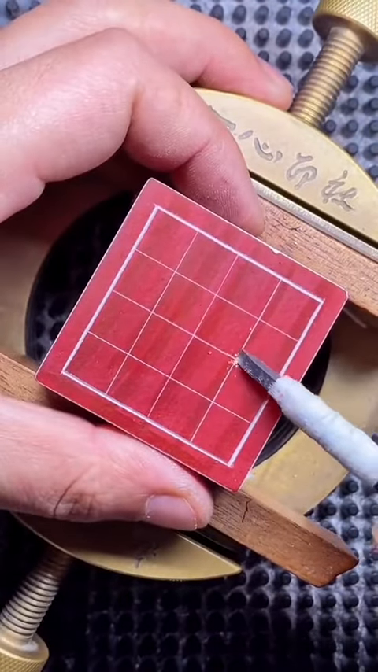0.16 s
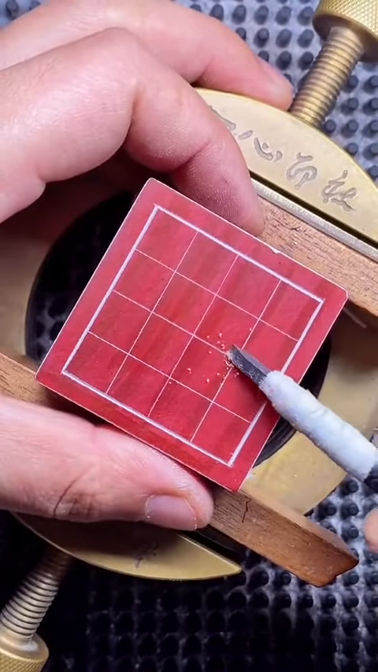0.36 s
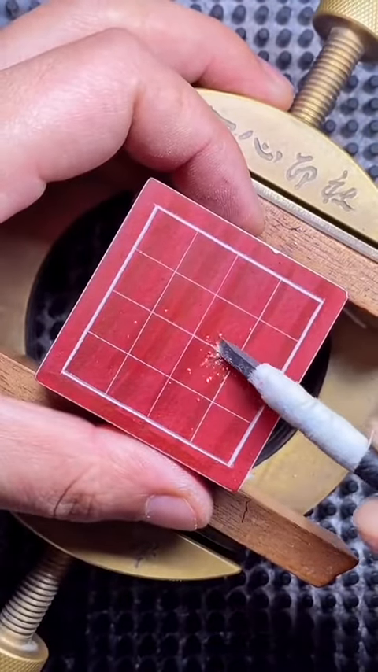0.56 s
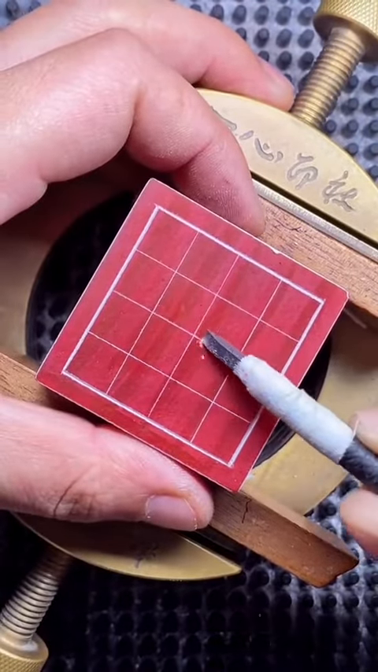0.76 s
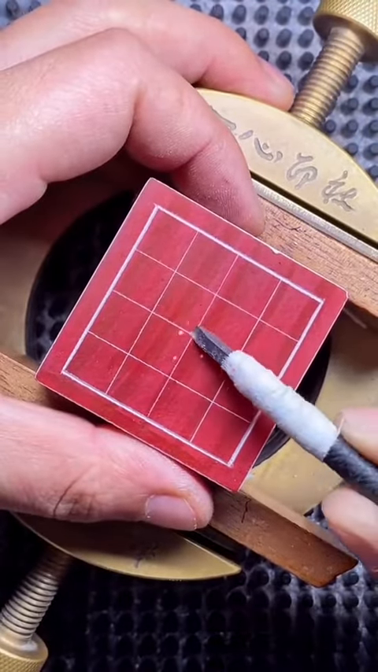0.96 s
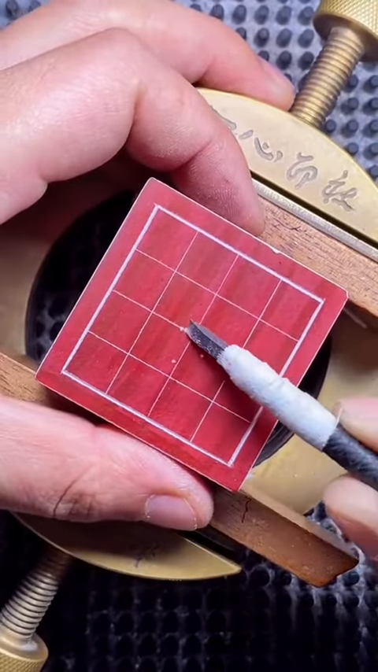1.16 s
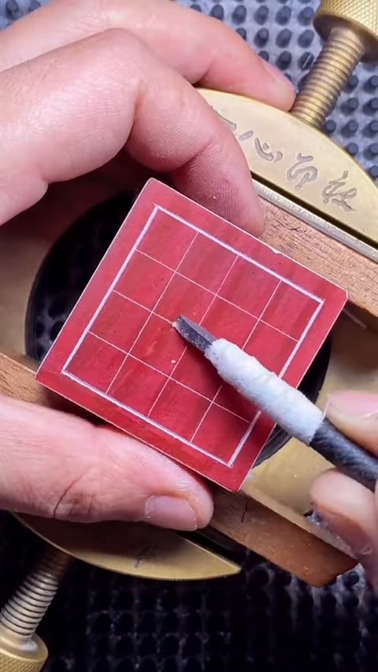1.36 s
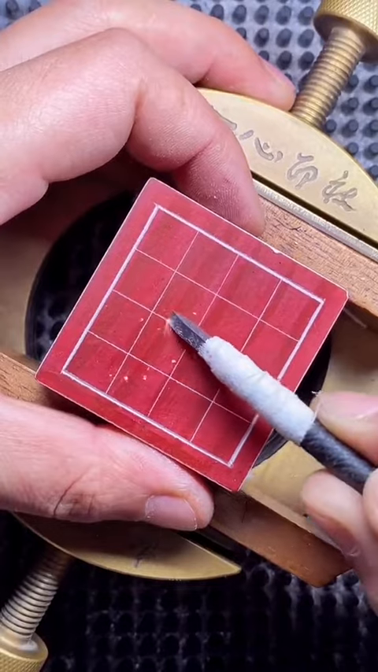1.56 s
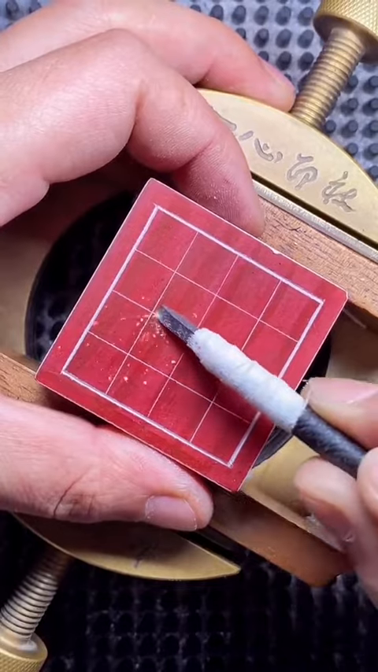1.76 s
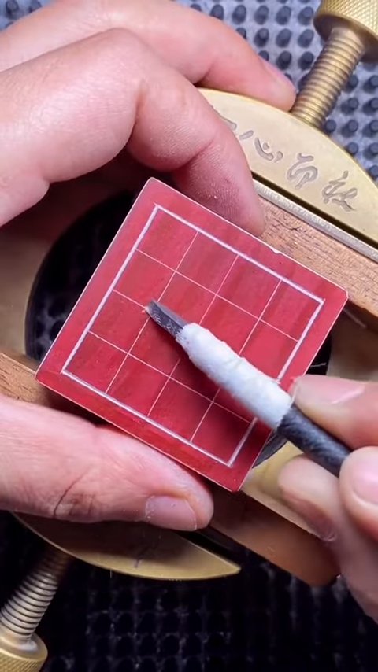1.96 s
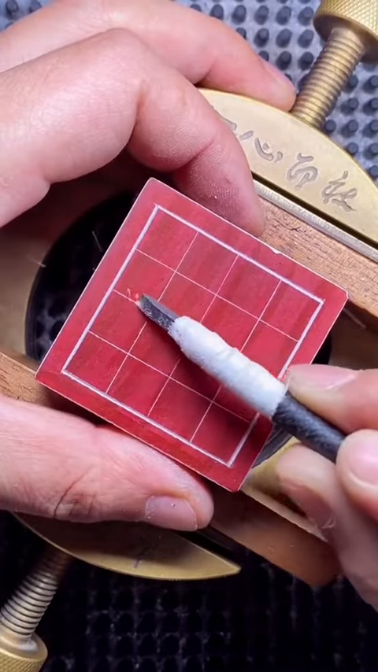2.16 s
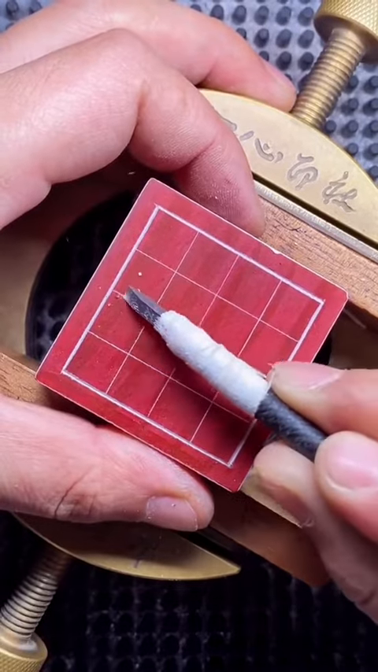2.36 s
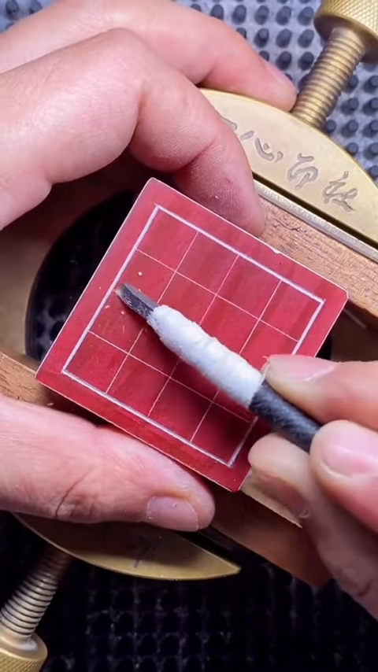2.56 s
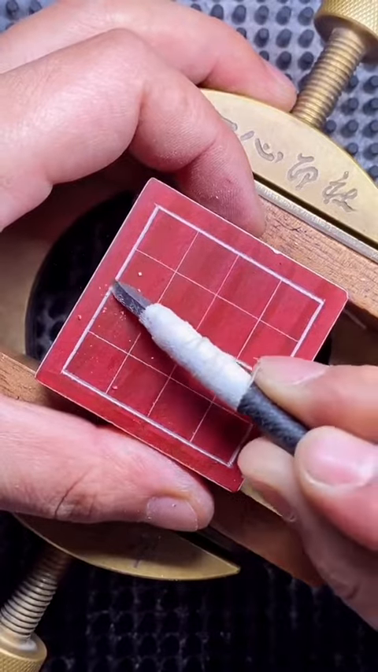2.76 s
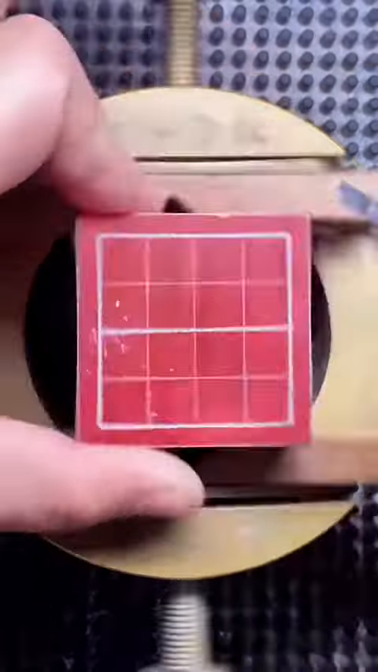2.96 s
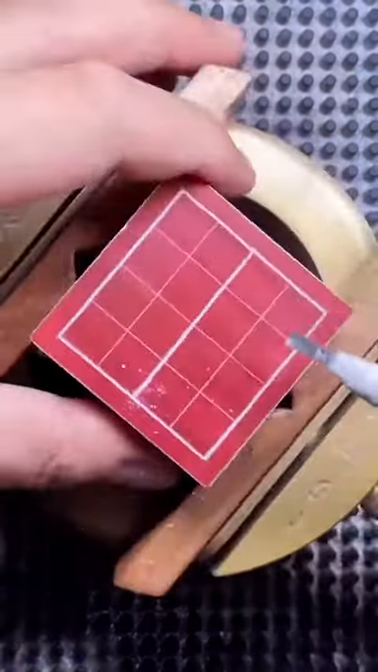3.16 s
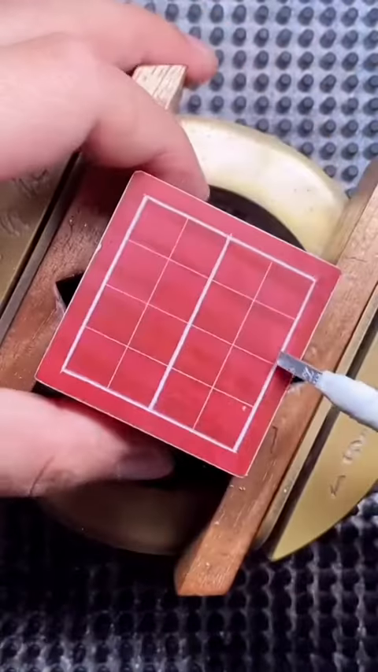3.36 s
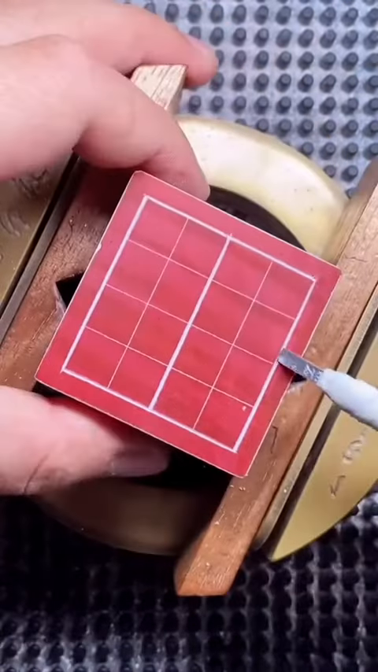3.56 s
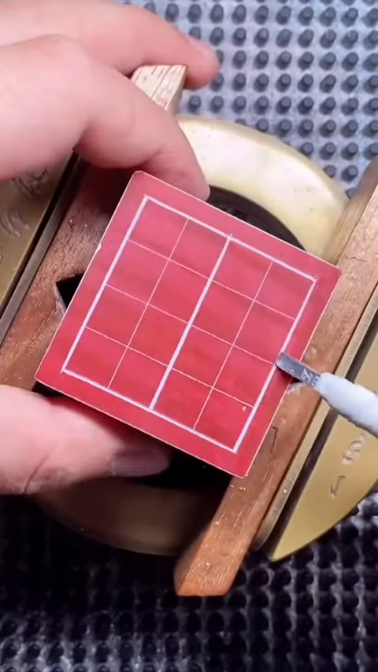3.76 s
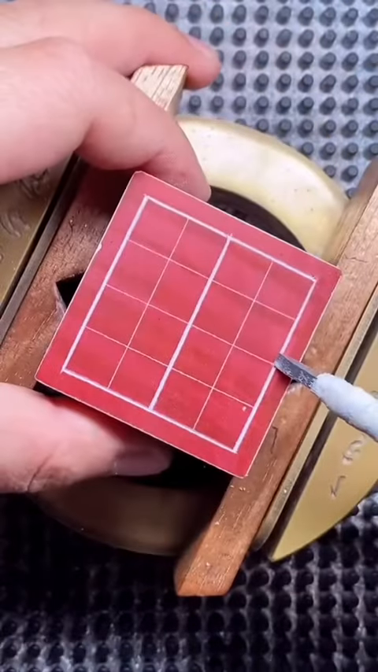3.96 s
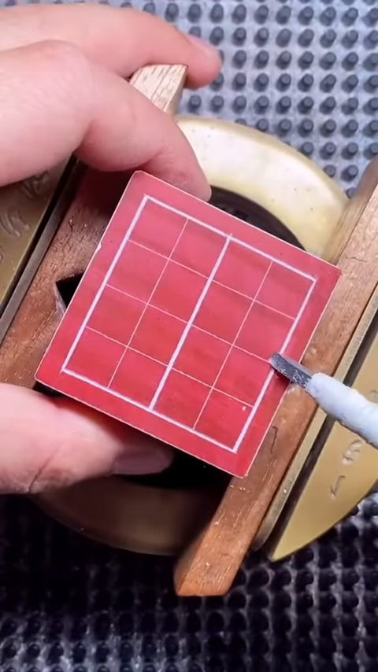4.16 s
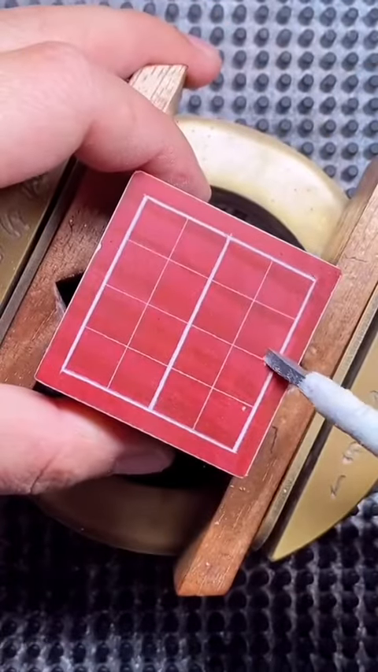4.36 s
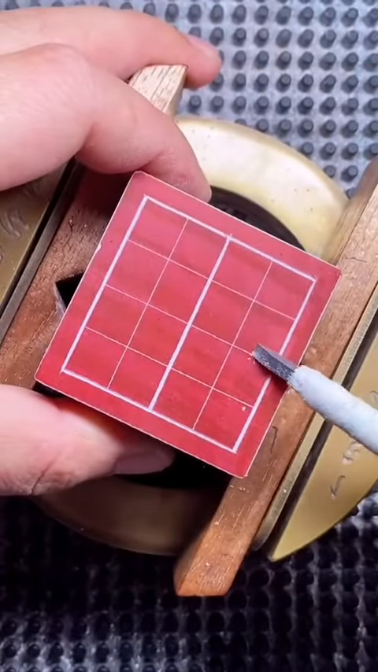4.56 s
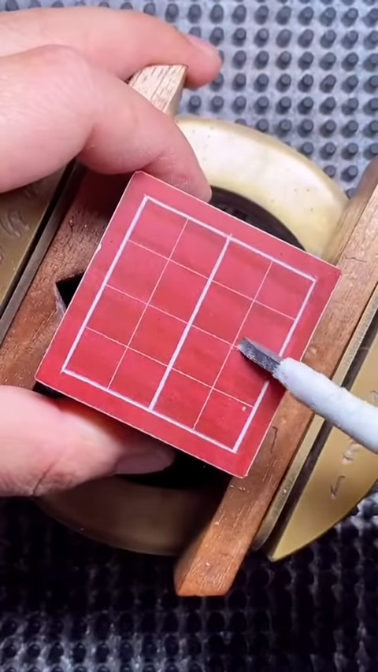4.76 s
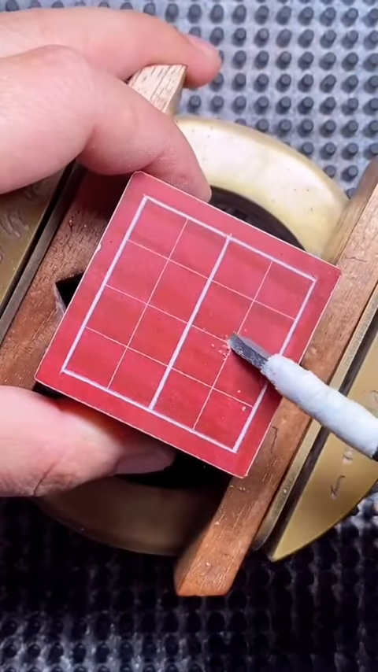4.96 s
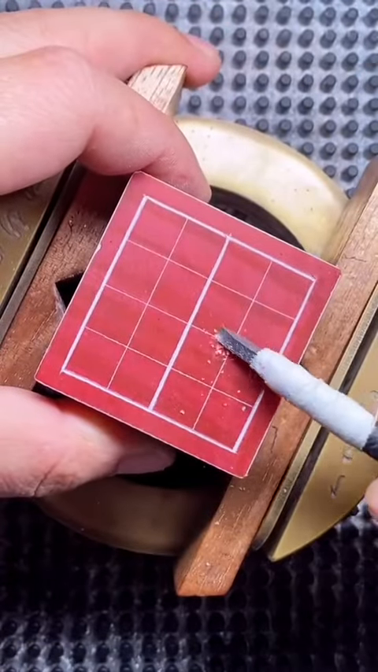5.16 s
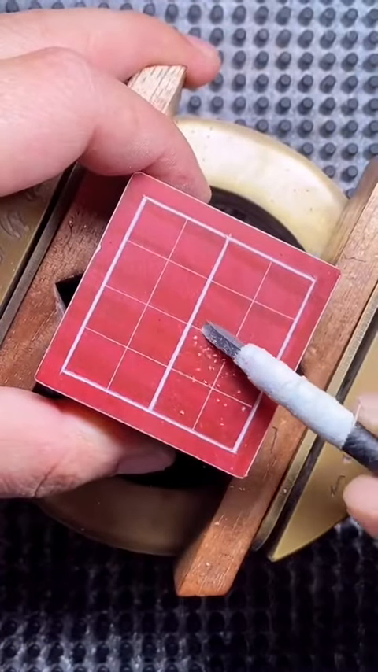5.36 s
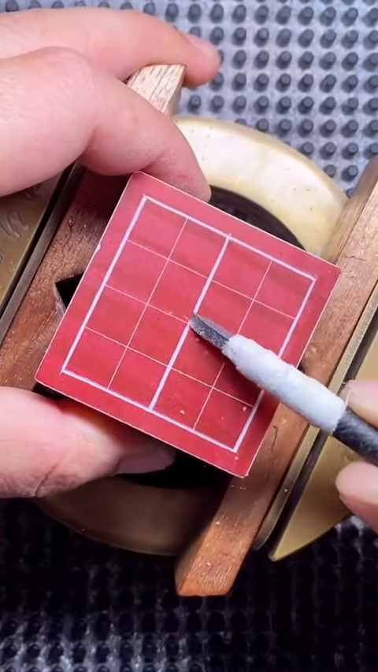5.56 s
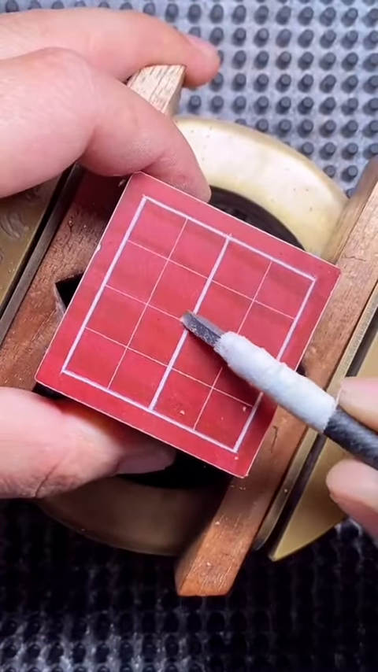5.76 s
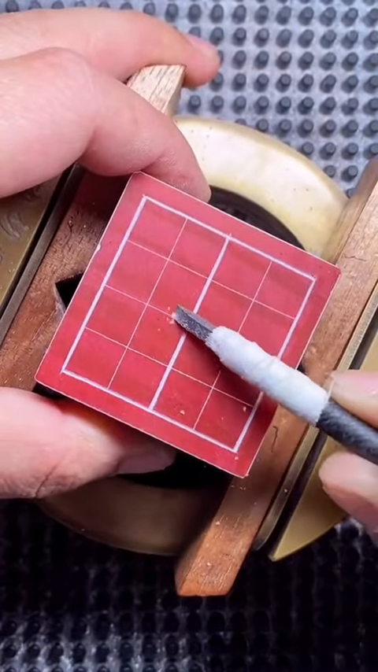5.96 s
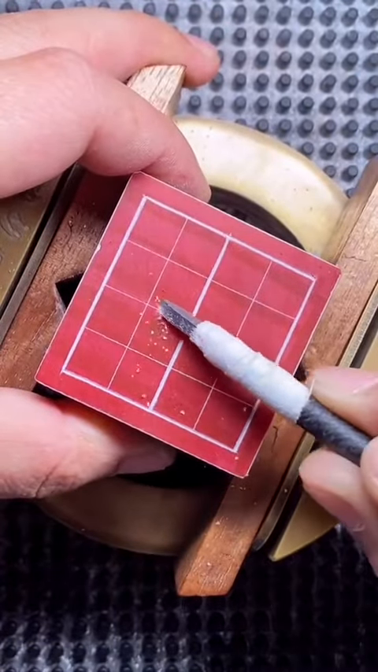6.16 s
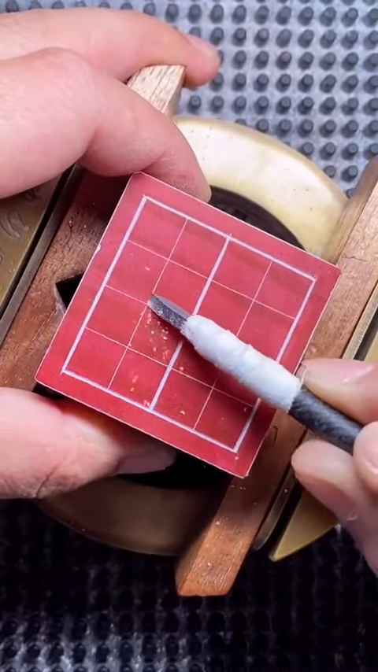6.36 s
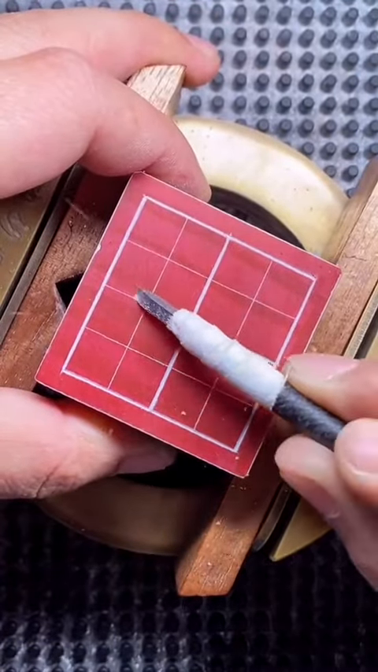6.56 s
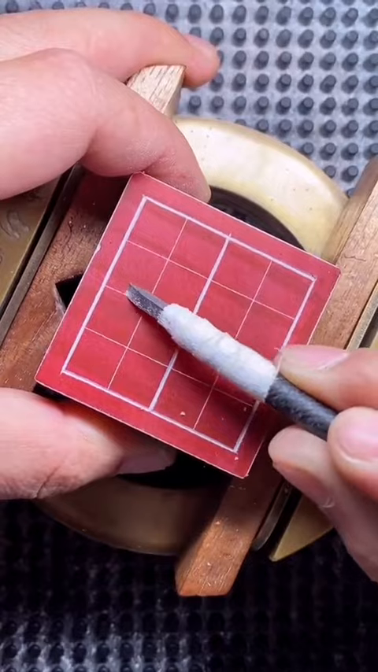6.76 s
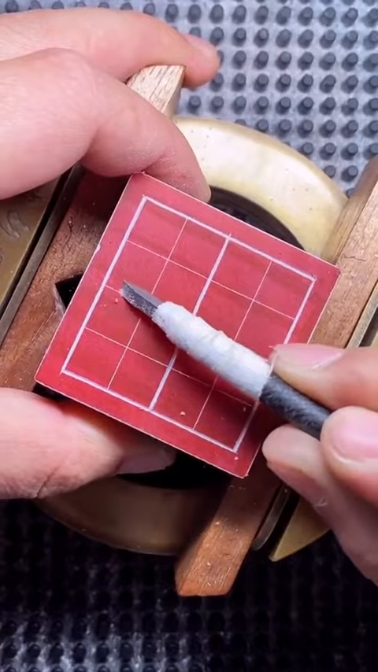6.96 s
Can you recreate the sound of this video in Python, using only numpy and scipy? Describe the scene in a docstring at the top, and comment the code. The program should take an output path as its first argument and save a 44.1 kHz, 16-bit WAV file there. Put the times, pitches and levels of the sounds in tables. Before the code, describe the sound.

Dry, jerky engraving strokes: the edge sticks, snaps off a chip, knocks the block and grinds on, many times a second. Near the middle, fingers brush metal, the heavy vise clunks and rubs round on the bench, and there is a near-silent pause. The second groove starts faintly and becomes crackly, brighter and more hollow. Close stereo microphone, almost no reverberation, faint low room air.

```python
"""A hand graver cuts grooves into a small coated block in a brass vise, close to the microphone in a small, dead room.
The edge sticks, a chip cracks off and knocks the block in its wooden jaws, then the edge grinds on through grit.
Midway the vise is swivelled on the bench, juddering, knocking and ringing; the block then answers higher, hissing more.
Knocks and cracks are pulses and tiny random fractures sent through ringing bodies; skids, rubs and strokes are
shaped grit, and the hand's rumble and bench thumps are coloured noise."""
import sys
import numpy as np
from scipy import signal
from scipy.fft import rfft, irfft
from scipy.io import wavfile
from scipy.ndimage import uniform_filter1d

SR = 44100
rng = np.random.default_rng(int(sys.argv[2]) if len(sys.argv) > 2 else 0)


def int16_out(signal):
    """Quantize to a 16-bit WAV file."""
    q = np.round(np.clip(np.atleast_2d(signal).T, -1, 1) * 32767)
    wavfile.write(sys.argv[1], SR, q.astype(np.int16))


N = 308259
T = np.arange(N) / SR
LENGTH = 8192  # samples in one short sound or impulse response
AGE = np.arange(LENGTH) / SR
LEAD_S = 0.02  # a short sound starts this long before its break or knock
SINCE = AGE - LEAD_S
TURNED_S = 3.5  # chips from here on are cut across the jaws
MIDDLING_CRACK_DB, MIDDLING_KNOCK_DB = -48, -31


def undb(db):
    """Decibels to gain."""
    return 10 ** (np.asarray(db) / 20)


def unit(x):
    """Scale to rms 1."""
    return x / np.sqrt(np.mean(x ** 2) + 1e-20)


def crest(x, size=133):
    """Scale so that the loudest three milliseconds have rms 1."""
    window = np.hanning(size)
    power = np.convolve(x ** 2, window / window.sum())
    return x / np.sqrt(power.max() + 1e-20)


def gains(points, count):
    """A (Hz, dB) table read at the bins of a transform, along log frequency."""
    hz, db = np.transpose(points)
    bins_hz = np.fft.rfftfreq(count, 1 / SR) + 1
    return undb(np.interp(np.log(bins_hz), np.log(hz), db))


def colour(x, points):
    """Filter a sound by a (Hz, dB) table without shifting it in time."""
    count = x.shape[-1]
    return irfft(rfft(x) * gains(points, count), count)


def response(points):
    """Causal impulse response of a body with a given spectrum, by folding its cepstrum."""
    cepstrum = irfft(np.log(gains(points, LENGTH)))
    cepstrum[1:LENGTH // 2] *= 2
    cepstrum[LENGTH // 2 + 1:] = 0
    return unit(irfft(np.exp(rfft(cepstrum))))


def ring(modes, alternate=False):
    """Impulse response of damped modes; with alternating signs they swell before they fade."""
    total = np.zeros(LENGTH)
    for k, (hz, width_hz, db) in enumerate(modes):
        sign = (-1) ** k if alternate else 1
        decay = np.exp(-np.pi * width_hz * AGE)
        total += sign * undb(db) * width_hz * decay * np.sin(2 * np.pi * hz * AGE)
    return unit(total)


def through(x, impulse):
    """Pass a force through a body."""
    return signal.fftconvolve(x, impulse)[:len(x)]


def grit(count, rate, spread_db):
    """Tiny fractures at random moments, rate per second, mostly small and a few large."""
    chance = rng.random(count)
    size = np.clip(rng.standard_normal(count), -2, 2)
    return (chance < rate / SR) * undb(spread_db * size) * rng.choice([-1, 1], count)


def stereo_grit(rate, spread_db):
    """Independent grit for mid and side, as long as the scene."""
    return np.array([grit(N, rate, spread_db) for _ in range(2)])


def scatter(fade_s, size=1024):
    """A fresh cluster of very early reflections, of unit energy."""
    taps = rng.standard_normal(size) * np.exp(-AGE[:size] / fade_s)
    return taps / np.sqrt(np.sum(taps ** 2))


def contact(body, share, fade_s):
    """Every spot on the coat favours other frequencies of a body."""
    return body + share * through(body, scatter(fade_s))


def add(track, x, s):
    """Mix a short sound into a (mid, side) track; the side is what glances off bench and hands."""
    start = int(round((s - LEAD_S) * SR))
    a, b = max(start, 0), min(start + len(x), N)
    pair = np.array([x, through(x, scatter(fade_s=0.0013))])
    track[:, a:b] += pair[:, a - start:b - start]


def brighten(x, db):
    """A harder, finer fracture has more treble: a shelf that climbs from 2600 to 4600 Hz."""
    return colour(x, [(2600, 0), (4600, db)])


def fracture(build_s, fade_s, rate):
    """Micro-cracks crowd up to the break and die away after it."""
    envelope = np.exp(np.minimum(SINCE / build_s, -SINCE / fade_s))
    return grit(LENGTH, rate, spread_db=3.5) * envelope


def release(delay_s, rebound_db, rebound_s):
    """The force let go around the break, and the rattle of the landing after it."""
    after = np.maximum(SINCE - delay_s, 0)
    rattle = grit(LENGTH, rate=770, spread_db=5) * np.exp(-after / rebound_s) * (after > 0)
    force = undb(rebound_db) * rattle
    force[np.argmin(abs(SINCE - delay_s))] += 1
    return force


def swell(s, rise_s, fall_s):
    """A level that grows up to a moment and dies away after it."""
    return np.exp(np.maximum(np.minimum((T - s) / rise_s, (s - T) / fall_s), -30))


def strokes(rows):
    """Summed bell-shaped levels of (middle, half length, dB) strokes."""
    return sum(undb(db) * np.exp(-((T - s) / half) ** 2) for s, half, db in rows)


# The block's pitch, climbing early in each groove as the edge travels from the rim inward.
# Each row: time in seconds, pitch as a share of the listed modes.
TRAVEL = [(0, 0.9), (.6, 0.98), (1.2, 1.03), (2.2, 1.028), (2.6, 1.02), (3.9, 0.944), (5.0, 0.996),
          (6.0, 0.98), (6.99, 0.98)]
# Colour of the breaking coat through plate and blade. Each row: frequency in Hz, level in dB.
BLADE = [(400, 6.5), (1000, 7.5), (1600, 5.5), (2000, -1.5), (2400, 5), (3000, -3), (3450, -6),
         (4000, -11.5), (5200, -16), (6800, -21), (8400, -19), (10400, -21), (12300, -20), (15500, -27)]
TREBLE_DB, TREBLE_PER_DB = 3.5, 0.38  # shelf at a middling crack, growth per dB of a louder one
TREBLE_SCATTER_DB = 2  # no two chips break alike


def carve(chips, modes, shank, shank_db, delay_s, build_s, bite_db,
          knock_trim_db, crack_trim_db, grind_db, hiss_db):
    """The edge bites, a chip knocks the block and cracks through the blade, the edge skids on in small slips."""
    out, coat = np.zeros((2, N)), response(BLADE)
    for s, knock_db, crack_db, skid_db, length_s in chips:
        treble_db = TREBLE_DB + TREBLE_PER_DB * (crack_db - MIDDLING_CRACK_DB)
        treble_db += TREBLE_SCATTER_DB * rng.uniform(-0.92, 1)
        pitch = np.interp(s, *np.transpose(TRAVEL))
        block = ring([(hz * pitch, width, db) for hz, width, db in modes], alternate=True)
        # the grip on the blade shifts its modes a little from cut to cut
        steel = ring([(hz * (1 + 0.03 * rng.standard_normal()), width, db) for hz, width, db in shank])
        edge = contact(coat + undb(shank_db) * steel, share=0.43, fade_s=0.0017)
        edge = brighten(edge, treble_db)

        force = release(delay_s, rebound_db=-13.5, rebound_s=0.0072)
        thud = crest(through(force, contact(block, share=0.34, fade_s=0.0027)))
        snap = crest(through(fracture(build_s, fade_s=0.0035, rate=12000), edge))
        # the coat crumbles under the edge while the force builds
        bite = crest(through(fracture(build_s=0.0064, fade_s=0.005, rate=13000), edge))

        # the skid takes hold just after the break and stalls as the groove resists
        stall = np.exp(-np.clip(SINCE / (1.11 * length_s), 0, 10) ** 4.4)
        skid = np.clip(SINCE / 0.0081, 0, 1) * stall
        slips = grit(LENGTH, rate=900, spread_db=3) * skid
        powder = grit(LENGTH, rate=7900, spread_db=3.5) * skid
        skid_rms = np.sqrt(np.mean(skid ** 2))
        grind = skid_rms * unit(through(slips, block))
        hiss = skid_rms * unit(through(unit(slips) + 0.81 * unit(powder), edge))

        knock = undb(knock_db + knock_trim_db) * thud
        crack = undb(crack_db + crack_trim_db) * (snap + undb(bite_db) * bite)
        scrape = undb(skid_db) * (undb(grind_db) * grind + undb(hiss_db) * hiss)
        add(out, knock + crack + scrape, s)
    return out


# Chips breaking off under the edge; each groove trims these levels. Each row: time in seconds, knock in dB,
# crack in dB, following skid in dB, nominal skid length in seconds.
CHIPS = [(0.008, -32, -49, -55.5, 0.03), (0.0567, -33, -52, -52.5, 0.041),
         (0.094, -32.5, -47, -50.5, 0.025), (0.1203, -32.5, -52, -45, 0.025),
         (0.15, -36, -55, -50.5, 0.019), (0.1714, -33.5, -51.5, -50.5, 0.034),
         (0.3026, -30.5, -54, -63.5, 0.062), (0.3646, -28.5, -44, -46.5, 0.025),
         (0.427, -27, -47, -56, 0.026), (0.444, -31, -54, -46, 0.026), (0.4627, -32.5, -60, -49, 0.027),
         (0.4845, -37, -49, -44, 0.014), (0.5526, -27.5, -42.5, -45.5, 0.022),
         (0.5793, -28.5, -49, -54, 0.033), (0.624, -28, -45.5, -46.5, 0.031),
         (0.6664, -26, -46.5, -46.5, 0.025), (0.6836, -30.5, -61, -53, 0.038),
         (0.7165, -34, -54, -59.0, 0.033), (0.7564, -35, -65, -50, 0.019),
         (0.783, -29.5, -58, -45.5, 0.017), (0.8465, -29, -46, -47.0, 0.022), (0.859, -33, -48, -57, 0.028),
         (0.896, -23.0, -47, -51, 0.031), (0.9388, -31, -58, -52.5, 0.017), (0.953, -33, -53, -73, 0.029),
         (1.036, -32, -44, -48.5, 0.017), (1.042, -26.5, -48, -72, 0.046),
         (1.093, -27.0, -42, -43.5, 0.028), (1.1066, -29.0, -49, -57, 0.021),
         (1.139, -26.5, -57, -74, 0.024), (1.1983, -28.5, -45, -60, 0.024),
         (1.2226, -25.0, -47.0, -47, 0.023), (1.2514, -29.5, -46.5, -42.5, 0.023),
         (1.4443, -25, -41.0, -49, 0.044), (1.4765, -22.5, -39.5, -56, 0.043),
         (1.5324, -23.5, -40.5, -49.5, 0.024), (1.574, -28.0, -44.5, -54, 0.027),
         (1.629, -25, -51, -59, 0.047), (1.656, -20.5, -41.5, -44, 0.025),
         (1.6746, -25.5, -47, -54.0, 0.024), (1.708, -30.5, -50, -67, 0.022),
         (1.7688, -26.5, -44.0, -55, 0.024), (1.784, -27, -54, -46, 0.027),
         (1.8053, -26.5, -48.5, -59, 0.025), (1.8202, -32, -60.0, -50, 0.035),
         (1.8728, -21, -48.5, -47, 0.026), (1.975, -20.5, -41.5, -47, 0.034),
         (2.0308, -20.5, -46.0, -40.5, 0.027), (2.0705, -26, -45.0, -67, 0.018),
         (2.116, -20.5, -41.5, -67, 0.016), (2.149, -21, -41.5, -65, 0.018),
         (2.183, -23, -39.5, -44, 0.035), (2.222, -20, -40.0, -41.0, 0.022),
         (2.305, -23.0, -43, -55, 0.019), (2.3908, -22.5, -41.5, -71, 0.019),
         (2.4594, -21.5, -40.5, -41.5, 0.031), (2.5773, -22.5, -41, -46, 0.025),
         (3.91, -46.5, -65, -77, 0.02), (3.946, -45, -70, -72, 0.016), (4.0055, -41, -59, -71, 0.011),
         (4.0377, -37.5, -51, -59.5, 0.031), (4.1103, -38.5, -53, -63.0, 0.032),
         (4.1616, -34, -48, -61, 0.049), (4.297, -41, -48.5, -60.5, 0.031), (4.324, -39, -50, -66, 0.059),
         (4.3757, -43.0, -61.0, -58, 0.051), (4.4377, -36, -47.5, -48, 0.025),
         (4.514, -33.0, -44, -47.5, 0.03), (4.5397, -46, -42, -52.5, 0.029),
         (4.558, -62, -49, -60.0, 0.021), (4.6116, -34, -39, -52.5, 0.03), (4.66, -33, -42.5, -49.5, 0.031),
         (4.6973, -35, -41, -49.5, 0.03), (4.715, -44, -50.0, -59.5, 0.034),
         (4.783, -37.5, -46.5, -53, 0.031), (4.806, -38, -48, -68, 0.023), (4.8323, -38, -48.5, -60, 0.024),
         (4.873, -34, -43, -49.5, 0.036), (4.908, -34, -47.5, -66, 0.017), (4.9697, -31, -43, -55.5, 0.021),
         (5.063, -33, -37.5, -59, 0.029), (5.087, -31.5, -40.5, -61, 0.0098),
         (5.1307, -32.5, -41.5, -47.5, 0.028), (5.157, -40, -51.0, -46.5, 0.025),
         (5.182, -35, -53.0, -68, 0.045), (5.2272, -34, -45, -51, 0.022),
         (5.2654, -29.0, -42.5, -65, 0.025), (5.325, -30, -39.5, -54.5, 0.021),
         (5.4338, -34.5, -43, -48.5, 0.026), (5.458, -42, -46, -56, 0.018),
         (5.5307, -40.0, -50, -56.5, 0.038), (5.5795, -29, -41.0, -66.5, 0.019),
         (5.6128, -29.5, -45, -50.5, 0.023), (5.6465, -32.5, -44.5, -53.5, 0.034),
         (5.7197, -28, -37.5, -48, 0.024), (5.741, -39, -43.5, -51.5, 0.018),
         (5.846, -35, -41, -51.5, 0.022), (5.9007, -31.5, -42.5, -51.5, 0.026),
         (5.932, -39, -44, -69, 0.021), (5.967, -38, -66, -51.0, 0.041),
         (6.004, -34.5, -43.5, -45.5, 0.032), (6.0262, -34, -44, -57, 0.019),
         (6.072, -33, -40.5, -74, 0.016), (6.1084, -36.5, -46.5, -72, 0.026),
         (6.1502, -29, -40, -48.5, 0.035), (6.2116, -31.5, -39.5, -59, 0.019),
         (6.2407, -33, -51, -45.5, 0.032), (6.305, -31, -42.0, -55, 0.034),
         (6.3507, -28.5, -39.0, -47.5, 0.019), (6.399, -30, -41.5, -51.0, 0.038),
         (6.421, -28, -46, -40.5, 0.019), (6.48, -36.5, -55, -49.5, 0.023), (6.5167, -32, -43, -68, 0.021),
         (6.558, -33.0, -48, -46, 0.023), (6.5802, -35, -39.5, -44.5, 0.028),
         (6.688, -33.5, -44.5, -52.5, 0.03), (6.8214, -31.5, -43.5, -62, 0.011),
         (6.8747, -26.5, -40.5, -57.5, 0.033), (6.9623, -28.5, -45.5, -49.5, 0.015)]
# The block in its jaws, pushed along them and across them.
# Each row: frequency in Hz, width in Hz, level in dB.
BLOCK_ALONG = [(148, 40, -13), (320.3, 112, -6), (421.6, 95.3, 1), (496, 106, -5), (680, 256, -23),
               (946, 74, -35), (1510, 1500, -39)]
BLOCK_ACROSS = [(160.2, 40, 6), (377, 62, 3), (617.5, 41, 7), (714.5, 101, 2.5), (883.5, 80, 0.5),
                (1045, 148, -5), (1415, 79, -11)]
# Ring of the steel blade in either groove; each cut shifts it a little.
# Each row: frequency in Hz, width in Hz, level in dB.
SHANK_ALONG = [(2390, 180, 1.5), (2630, 89, 5), (3780, 240, -8), (4840, 760, -19), (10380, 500, -13)]
SHANK_ACROSS = [(2696, 96, 10), (3950, 250, -10.5), (4580, 220, -12.5), (10340, 750, -17)]


def graver():
    """One groove along the jaws, then one across them, where the block rings in other modes."""
    first = carve([c for c in CHIPS if c[0] < TURNED_S], BLOCK_ALONG, SHANK_ALONG, shank_db=-5,
                  delay_s=-0.00017, build_s=0.0015, bite_db=-10.5,
                  knock_trim_db=0.0, crack_trim_db=1.0, grind_db=9, hiss_db=-8)
    second = carve([c for c in CHIPS if c[0] >= TURNED_S], BLOCK_ACROSS, SHANK_ACROSS, shank_db=-4,
                   delay_s=-0.00036, build_s=0.0012, bite_db=-12.5,
                   knock_trim_db=0.5, crack_trim_db=-0.5, grind_db=7, hiss_db=-2.5)
    return first + second


def ebb(power, fade_s):
    """Power that leaks away after each pulse; its level falls by 1/e in fade_s."""
    return signal.lfilter([1], [1, -np.exp(-2 / (fade_s * SR))], power + 1e-18)


def effort(db, rise_s, fall_s):
    """Level of the hand's push: it builds before every chip and ebbs after it."""
    power = np.zeros(N)
    power[[int(c[0] * SR) for c in CHIPS]] = undb(db) ** 2
    return np.sqrt(ebb(power, fall_s) + ebb(power[::-1], rise_s)[::-1])


# The hand's push around each chip: times in seconds, rumble and rubbing levels in dB.
PRESS_S, RELAX_S, RUB_FADE_S = 0.02, 0.053, 0.04  # the hand loads the edge, relaxes; the rub fades
HAND_ALONG_DB, HAND_ACROSS_DB = -55, -50  # rumble per chip at a middling knock
RUB_ALONG_DB, RUB_ACROSS_DB = -66, -58  # light rubbing per chip at a middling knock
HAND_PER_DB = 0.52  # growth of both per dB of knock
HEAVE_S, HEAVE_FADE_S, HEAVE_DB = 2.985, 0.032, -42  # the hand heaves the vise round


def bearing():
    """Around the chips the hand rumbles through the vise and the edge rubs lightly on the coat."""
    s, knock_db = np.transpose(CHIPS)[:2]
    push_db = HAND_PER_DB * (knock_db - MIDDLING_KNOCK_DB)
    rumble = colour(rng.standard_normal((2, N)), [(20, -7), (40, -14.5), (90, -1), (155, 1), (230, -8.0),
                                                  (400, -9.0), (900, -20.5), (3000, -70)])
    body = ring(BLOCK_ACROSS, alternate=True) + 0.34 * response(BLADE)
    rub = np.array([through(x, body) for x in stereo_grit(rate=1900, spread_db=4.0)])
    along = s < TURNED_S
    hand = effort(push_db + np.where(along, HAND_ALONG_DB, HAND_ACROSS_DB), PRESS_S, RELAX_S)
    heave = undb(HEAVE_DB) * swell(HEAVE_S, HEAVE_FADE_S, HEAVE_FADE_S)
    rubbing = effort(push_db + np.where(along, RUB_ALONG_DB, RUB_ACROSS_DB), PRESS_S, RUB_FADE_S)
    return unit(rumble) * (hand + heave) + unit(rub) * rubbing


# The edge gliding over the smooth coat before it bites.
# Each row: middle in seconds, half length in seconds, level in dB.
GLIDES = [(0.624, 0.02, -64), (4.035, 0.0094, -68), (4.296, 0.013, -62), (4.402, 0.033, -73.5),
          (4.971, 0.0049, -51.5)]
# Its thin hiss. Each row: frequency in Hz, level in dB.
GLIDE_HISS = [(3000, -13), (6500, -14), (8500, -16), (10400, 8), (12500, -15), (15500, -13)]


def gliding():
    """Where the edge finds no hold it hisses thinly over the coat: dense, even grit."""
    hiss = unit(colour(stereo_grit(rate=16000, spread_db=1), GLIDE_HISS))
    return strokes(GLIDES) * hiss


# Fingertips brushing over the vise as the grip changes.
# Each row: middle in seconds, half length in seconds, level in dB.
BRUSHES = [(2.726, 0.015, -61), (2.785, 0.073, -61.5), (2.833, 0.011, -56), (3.439, 0.022, -64.5),
           (3.543, .016, -60.5)]
# Skin on brass. Each row: frequency in Hz, level in dB.
SKIN = [(100, 10), (500, 13.5), (1000, -1.5), (2000, -3), (4000, -9.5), (6300, -8.5), (7600, -17),
        (10300, -3), (13000, -14.5), (15500, -13.5)]


def fingers():
    """Dry skin slides over the brass in soft, airy strokes of very dense grit."""
    airy = unit(colour(stereo_grit(rate=60000, spread_db=2), SKIN))
    return strokes(BRUSHES) * airy


# Shoves that drag the vise round, before a trim of each layer.
# Each row: middle in seconds, half length in seconds, rumble in dB, hiss in dB.
SWIVEL = [(2.869, 0.031, -32.5, -49.5), (2.915, 0.024, -25.5, -38), (2.976, .026, -34, -42.5),
          (3.086, 0.015, -35, -38), (3.128, 0.017, -36.5, -51.5), (3.205, 0.055, -52, -61.5),
          (3.307, 0.04, -58, -76)]
# Knocks as the vise is turned: bumps, a tap of the wooden jaw, then the graver tip landing.
# Each row: time in seconds, thud in dB, click in dB.
TURN_KNOCKS = [(2.8628, -24, -52.5), (2.8971, -21, -61.5), (2.9062, -24.5, -37), (2.9163, -25, -50.5),
               (3.0387, -26, -33.5), (3.2023, -26.5, -35.5)]
# The vise sliding on its base, low and high. Each row: frequency in Hz, level in dB.
BASE = [(30, -21), (90, -6.5), (160, 9.5), (230, 1.5), (320, 7.5), (440, 10), (600, 2.5), (820, -2),
        (1100, -17), (1500, -35.5), (2500, -44)]
BRASS = [(600, -20), (1100, 2.5), (1400, 4), (1900, -2.5), (2400, 1), (3200, -4.5), (4100, -16),
         (4800, 1.5), (5400, -12.5), (6300, -11.5), (7600, -23.5), (10300, -10.5), (13000, -24.5),
         (15500, -45)]
# The click of a knock. Each row: frequency in Hz, level in dB.
TAP = [(500, -0.5), (1100, 1), (1500, 1.5), (2700, -6.5), (3700, -5), (4200, -22.5), (4900, -11),
       (6200, -18), (7600, -27), (10300, -35), (15500, -41)]
# Ring of the brass bowl, and low ring of the whole vise after a knock.
# Each row: frequency in Hz, width in Hz, level in dB.
BOWL = [(4940, 17, -6), (4630, 45, 8), (5124, 9.8, -16.5), (5030, 8.5, -32), (6089, 12, -8.5),
        (6220, 13, 3.5), (15330, 7.7, -4.5)]
VISE_BODY = [(159, 18, -2), (870, 8.7, 2), (933, 11.9, 2)]


def vise():
    """The vise judders round on its base amid knocks; grit rubs the base and the faintly ringing bowl."""
    middle, half, rumble_db, hiss_db = np.transpose(SWIVEL)
    # every shove swells and ebbs alike
    shoves = np.exp(-np.minimum(abs(T - middle[:, None]) / half[:, None], 10) ** 1.9)
    base, brass = response(BASE), response(BRASS) + 0.31 * ring(BOWL)
    # the base catches and slips many times a second
    judder = undb(1.7 * unit(uniform_filter1d(rng.standard_normal(N), size=300)))
    out = np.zeros((2, N))
    for db, body in ((rumble_db - 2.0, base), (hiss_db - 4.5, brass)):
        drive = unit(judder) * (undb(db) @ shoves)
        body_unit = body / np.sqrt(np.sum(body ** 2))
        out += [through(unit(x) * drive, body_unit) for x in stereo_grit(rate=3800, spread_db=1.5)]

    struck = base + 0.33 * ring(BLOCK_ALONG, alternate=True)
    for s, thud_db, click_db in TURN_KNOCKS:
        thud = crest(through(release(delay_s=0.00033, rebound_db=-1, rebound_s=0.0027), struck))
        click = crest(through(fracture(build_s=0.0052, fade_s=0.0029, rate=8800), response(TAP)))
        # the heavy brass sings on softly after each knock
        after_ring = crest(np.roll(ring(VISE_BODY), int(LEAD_S * SR)) * (SINCE > 0))
        add(out, undb(thud_db) * (thud + undb(-20.0) * after_ring) + undb(click_db) * click, s)
    return out


# The hand coming down on the bench as it turns the vise. Each row: time in seconds, level in dB.
THUMPS = [(2.89, -44), (3.065, -47), (3.18, -47.5), (3.29, -62)]
# The bench's deep answer. Each row: frequency in Hz, level in dB.
THUMP_COLOUR = [(20, -5.5), (55, 3.5), (85, -5), (140, -22), (400, -57)]


def bench():
    """The hand's weight lands on the bench in soft, deep thumps of low noise."""
    thumps = sum(undb(db) * swell(s, rise_s=0.012, fall_s=0.024) for s, db in THUMPS)
    return thumps * unit(colour(rng.standard_normal((2, N)), THUMP_COLOUR))


def echoes(x, points, t60, onset_s):
    """Scattered reflections that reach one side of the microphone, as a fading noise tail."""
    tail = rng.standard_normal(2 * LENGTH)
    age = T[:len(tail)]
    tail *= np.exp(-np.log(1000) * age / t60) * np.clip(age / onset_s, 0, 1) ** 2
    return colour(through(x, tail / np.sqrt(np.sum(tail ** 2))), points)


# Share of the sound that the bench and the walls send back. Each row: frequency in Hz, level in dB.
BENCH_RETURN = [(60, -22), (300, -29.5), (650, -12.5), (1200, -22), (2500, -17.5), (5000, -13.5),
                (14000, -8)]
WALL_RETURN = [(60, -32.5), (160, -15.5), (400, -18), (900, -4), (2500, -14.5), (6000, -11.5), (14000, -10)]
# Left minus right of the direct sound. Each row: frequency in Hz, difference in dB.
BALANCE_LR = [(100, 0.5), (200, -1.5), (380, -2.5), (700, -3.5), (1290, -0.5), (4400, -0.5)]
# Colour of the still air of the room. Each row: frequency in Hz, level in dB.
AIR = [(25, -10), (60, -4), (115, -4), (155, 1.5), (330, -13), (620, -14.5), (1000, -20.5), (1700, -26.5),
       (4000, -31.5), (7000, -37), (11000, -36.5), (15500, -60)]
AIR_DB = -70.5  # rms level in each channel


def scene():
    """The work sits slightly right of centre, over a bench in a small, dead room."""
    work, glancing = graver() + bearing() + gliding() + fingers() + vise() + bench()
    spread = colour(glancing, BENCH_RETURN)
    air = rng.standard_normal(N)
    channels = []
    for side in (1, -1):  # left, right
        direct = colour(work, [(hz, side * db / 2) for hz, db in BALANCE_LR])
        # the air is partly shared by both sides
        still = unit(colour(air + 0.5 * rng.standard_normal(N), AIR))
        room = echoes(work, WALL_RETURN, t60=0.2, onset_s=0.01)
        channels.append(direct + side * spread + room + undb(AIR_DB) * still)
    return np.array(channels)


def record(dry):
    """The recorder cuts the top steeply above 15.8 kHz with an elliptic low-pass."""
    return signal.sosfilt(signal.ellip(10, 0.2, 80, 15800, fs=SR, output="sos"), dry)


dry = scene()
out = record(dry)
int16_out(out)
```